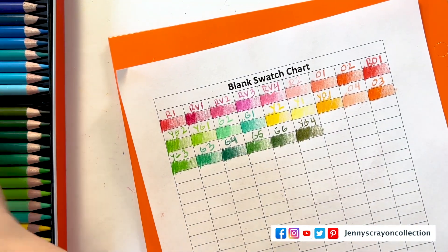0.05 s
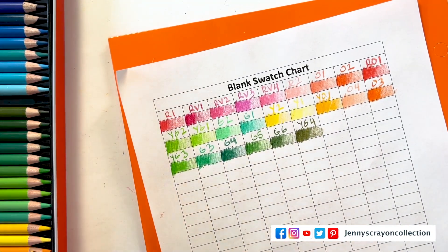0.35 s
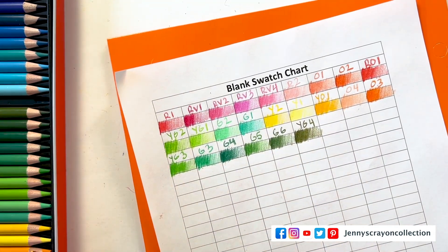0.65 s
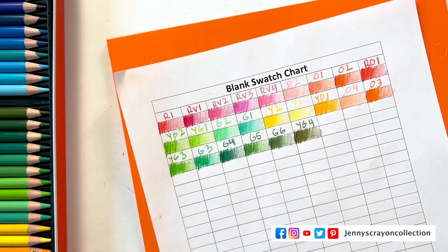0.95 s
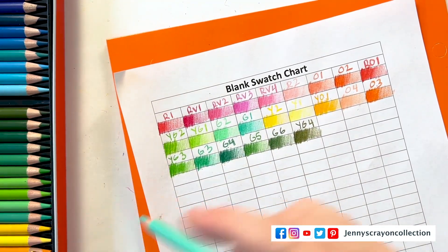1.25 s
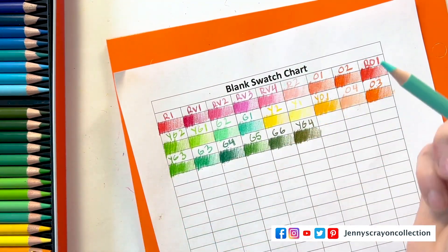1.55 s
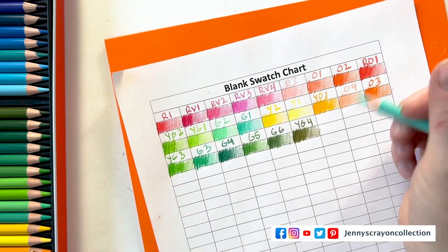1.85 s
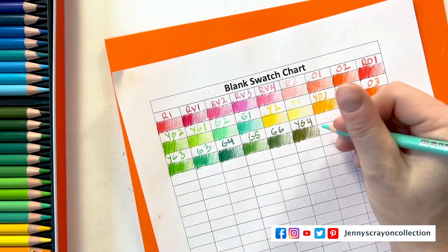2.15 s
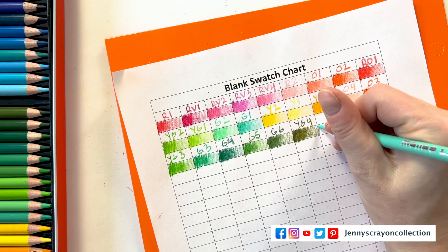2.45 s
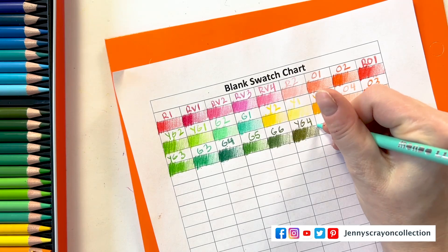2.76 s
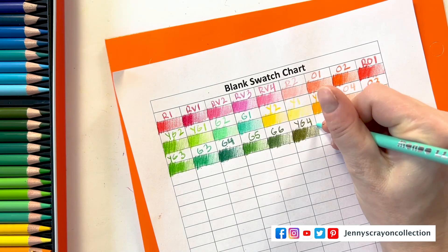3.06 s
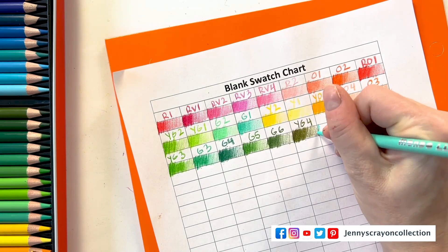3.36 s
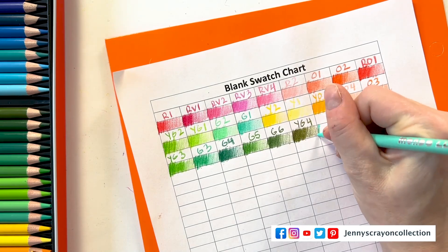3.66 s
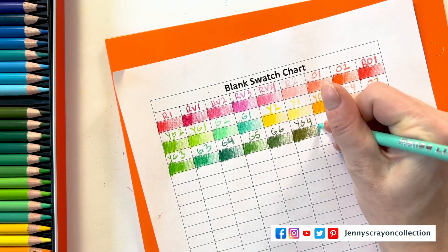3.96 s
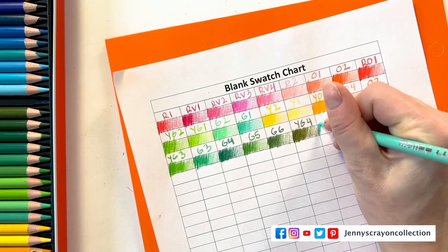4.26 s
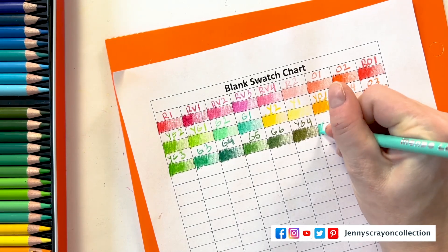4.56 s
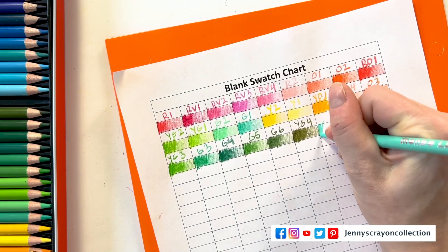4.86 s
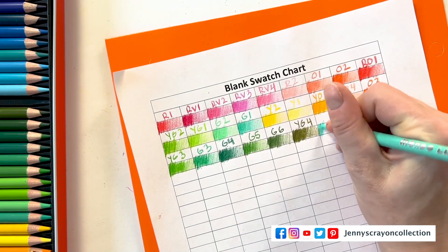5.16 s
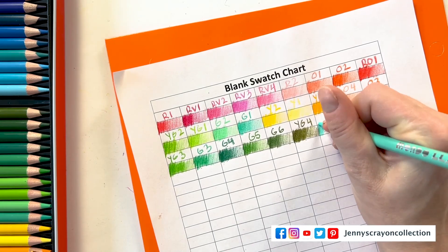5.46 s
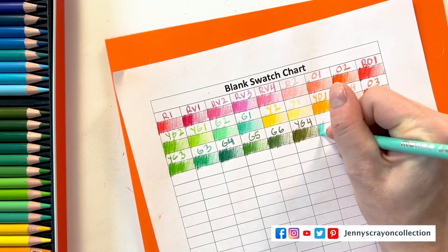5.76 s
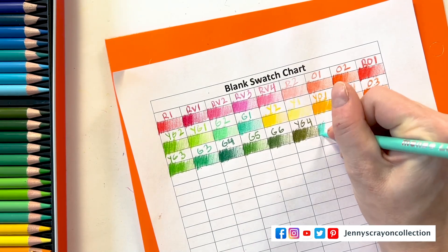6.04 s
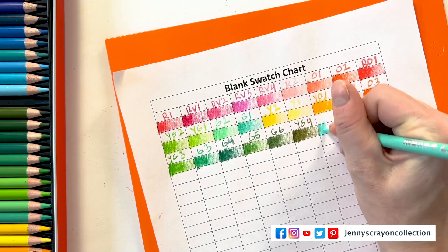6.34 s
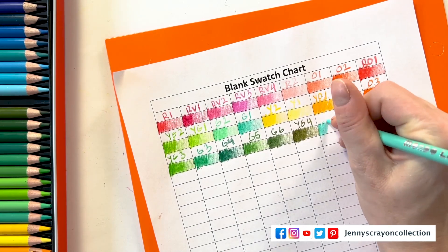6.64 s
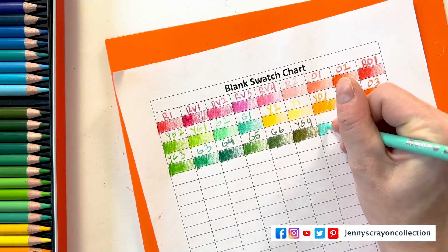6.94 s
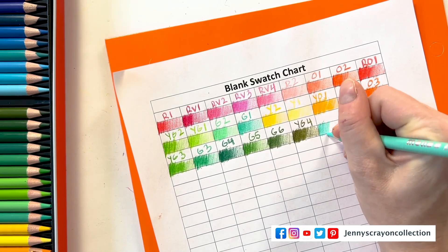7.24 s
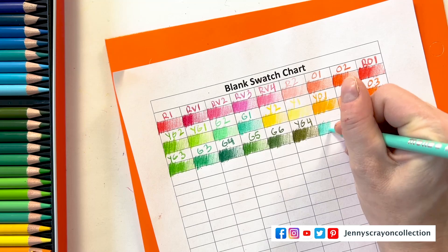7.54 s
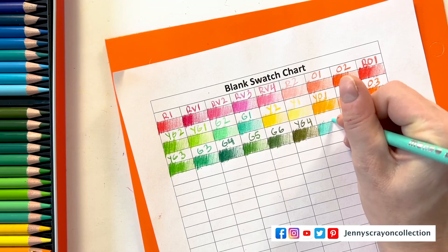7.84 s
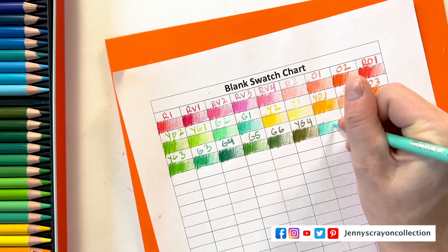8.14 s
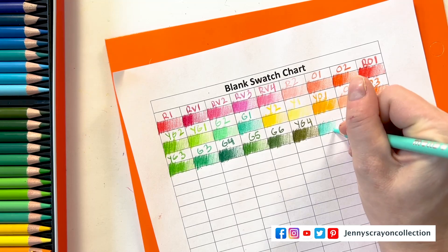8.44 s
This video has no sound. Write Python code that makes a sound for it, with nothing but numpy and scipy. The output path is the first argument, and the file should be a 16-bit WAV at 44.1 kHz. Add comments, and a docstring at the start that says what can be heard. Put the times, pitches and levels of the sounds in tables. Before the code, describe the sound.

A pencil clacks out of its tray, then shades softly on paper in quick, even back-and-forth strokes.

```python
"""A coloured pencil shades a small box, back and forth about four times a second, its lead rasping
over the grain of the paper while each push shakes the desk. Before the shading starts, the pencil
slides out of its tray, clacking against its neighbours, and a hand brushes the page and settles on
the desk. Rubs are dense tiny slips of friction; clacks, ticks and thuds are short blows ringing a body.
A small room answers, and a close stereo microphone hears it all over a low hum."""
import sys
import numpy as np
from scipy import signal
from scipy.fft import rfft, irfft, next_fast_len
from scipy.io import wavfile
from scipy.ndimage import uniform_filter1d, map_coordinates

SR = 44100
rng = np.random.default_rng(int(sys.argv[2]) if len(sys.argv) > 2 else 0)


def dump_mix(stems):
    """Bounce the given channels to the path in sys.argv[1] as a 16-bit WAV at rate SR."""
    frames = np.atleast_2d(stems).T  # one column per channel
    limited = np.clip(frames, -1, 1)  # hard clip at full scale
    pcm = np.round(limited * 32767).astype(np.int16)
    wavfile.write(sys.argv[1], SR, pcm)


N = 383669

# Pencil swings, out and back: far_turn_s, push_db, pull_db
SWINGS = [(2.614, -95.5, -77), (2.852, -70.0, -70.5), (3.083, -70.0, -68), (3.317, -70.5, -66.5),
          (3.56, -65.5, -63.0), (3.81, -60.5, -64), (4.057, -61.5, -62.5), (4.294, -63.5, -63),
          (4.538, -57, -58.5), (4.787, -62.0, -64.5), (5.025, -59.5, -61.5), (5.262, -63.5, -70.5),
          (5.502, -69, -69), (5.733, -66.5, -67.0), (5.977, -60.5, -63), (6.22, -59, -63),
          (6.46, -59.5, -63), (6.705, -58, -62.5), (6.947, -59.0, -62), (7.184, -59, -60.5),
          (7.427, -58.5, -63.5), (7.669, -59.5, -63.5), (7.91, -60.5, -61.5), (8.15, -59.5, -61.0),
          (8.392, -59.5, -62.5), (8.626, -59, -62.5)]
# The hand loosens up: time_s, turn_pause_s, pull_length_s, push_rise_share
LOOSENING = [(2.6, .034, .104, .56), (8.7, .010, .127, .70)]
PUSH_S, PULL_RISE_SHARE = .083, .385  # the rise is the part of a stroke spent speeding up
BITE_DB = 1  # treble gained pushing against the grain, lost pulling back
def strokes():
    """A short push, a pause, a longer pull; yields start_s, length_s, rise_share, level_db, bite_db."""
    when, *columns = np.transpose(LOOSENING)
    for turn, push_db, pull_db in SWINGS:
        pause, pull_s, push_rise = (np.interp(turn, when, column) for column in columns)
        yield turn - pause / 2 - PUSH_S, PUSH_S, push_rise, push_db, BITE_DB
        yield turn + pause / 2, pull_s, PULL_RISE_SHARE, pull_db, -BITE_DB


# Tone of lead on paper: freq_hz, gain_db
RASP_EQ = [(300,-28), (600,-8.5), (900,-11), (1250,2), (2000,-6), (5000,-10), (8400,-7), (12000,-0.5),
           (15300,-9.5)]
# Resonances of pencil and sheet: centre_hz, half_width_hz, boost_db
RASP_PEAKS = [(1896,292,9), (2480,163,9.5), (3185,330,9.5), (4256,450,7), (5630,280,5), (6380,110,5.5),
              (6950,203,9.5), (7460,260,7.5), (9270,270,6.5), (9920,140,7.5), (11730,460,3),
              (13400,430,6.5)]
# Stereo image of the page: freq_hz, coherence
PAGE_IMAGE = [(100, 1), (300, 0.65), (650, -0.35), (1300, 0.97), (1900, 1), (2900, 0.81), (4200, 0.92),
              (5000, 0.031), (6000, 1), (8400, 0.89), (11000, 0.78), (13000, 1)]
def lead_rasp(speed, progress, bite_db):
    """Waxy lead slips on the grain so densely that it merges into a rasp; faster means more slips."""
    slips = friction(4000 + 18000 * speed, size_db=1)
    slips = patchy(slips, depth_db=1.7)  # ever a new patch of paper, a new facet of the lead
    rasp = spread(slips, colour(RASP_EQ, RASP_PEAKS), PAGE_IMAGE)
    rasp *= amp(1.1 * wobble(150) + .77 * wobble(50))
    body = filtered(rasp, lambda hz: below(hz, edge_hz=5500))
    # The tip bites brightly as it sets off (progress -1) and drags darker as it slows (+1).
    return body * amp(.74 + 5 * progress) + (rasp - body) * amp(bite_db - 2.3 * progress)


# Desk rumble under each stroke: freq_hz, gain_db
RUMBLE_EQ = [(25, -10.5), (60, 4.5), (120, -4), (180, -4.5), (260, -17), (420, -24), (650, -12),
             (900, -34.5), (2000, -53)]
# Tone of the desk's boards: freq_hz, gain_db
BOARDS_EQ = [(80, -7.5), (170, 2.5), (260, -6), (370, -2), (500, -6.5), (680, -2), (900, -16.5),
             (2000, -18), (5000, -51)]
# The boards come up as the hand leans in: time_s, level_db
LEANING = [(2.6, -87.5), (3.2, -84), (3.4, -72), (3.75, -68), (4.3, -82.5), (4.5, -69.5), (5.1, -81.5),
           (5.4, -87), (8.7, -86.5)]
FIRM_DB, SKIM_S_PER_DB = -62, .0015  # strokes lighter than firm touch the paper for less time
RUMBLE_DB, RUMBLE_SCATTER_DB = -71.5, 1.5
def shading():
    """The lead speeds up and stops in each stroke; rasp, rumble and boards swell with its speed."""
    t = np.arange(N) / SR
    speed, rasp_gain, shake, progress, bite = np.zeros((5, N))
    for start, length, rise, rasp_db, bite_db in strokes():
        lifted = np.clip(SKIM_S_PER_DB * (FIRM_DB - rasp_db), 0, length / 2)
        start, length = start + lifted / 2, length - lifted
        on = (t > start) & (t < start + length)
        travel = np.interp((t[on] - start) / length, [0, rise, 1], [0, .5, 1])
        speed[on] = np.abs(np.sin(np.pi * travel))
        rasp_gain[on] = amp(rasp_db + .15) * speed[on] ** 1.5
        shake[on] = amp(RUMBLE_DB + RUMBLE_SCATTER_DB * rng.standard_normal()) * speed[on]
        progress[on], bite[on] = 2 * travel - 1, bite_db
    rasp = lead_rasp(speed, progress, bite)
    boards = spread(noise(), colour(BOARDS_EQ), PAGE_IMAGE) * amp(curve(LEANING) + 2.8 * wobble(45))
    rumble = spread(noise(), colour(RUMBLE_EQ), AIR_IMAGE)
    return rasp_gain * rasp + shake * rumble + speed * boards


# The lead ticks on the page: start_s, level_db, cutoff_hz
TICKS = [(.819, -70, 15000), (1.91, -65, 2503), (2.483, -67.5, 700), (2.584, -68, 700), (2.889, -63, 2980),
         (3.441, -64, 5000), (3.449, -40.5, 18000), (3.4505, -40, 18000), (5.055, -62, 9000)]
# Tone of the tip: freq_hz, gain_db
TIP_EQ = [(500, -35), (1300, -15), (2400, -5), (3800, 1), (5000, -10.5), (6500, 4.5), (9000, -5),
          (13000, 2), (15500, -8.5)]
def ticks():
    """The hard tip catches and snaps free."""
    track = np.zeros(N)
    for start, db, cutoff_hz in TICKS:
        tone = lambda hz: colour(TIP_EQ)(hz) * below(hz, cutoff_hz) ** 2
        add(track, start, amp(db - 5) * blow(tone, t60=.0056))
    return track


# Pencils knock together in the tray: start_s, hollow_db, body_db, edge_db
CLACKS = [(0.0378, -59.5, -46.5, -42), (.047, -33.5, -16, -13.5), (.059, -37.5, -32.5, -32.5),
          (.291, -53, -50, -60), (.311, -48, -45, -49), (.330, -70, -51, -39), (.375, -29.5, -28.5, -29),
          (.380, -44, -34.5, -43.5), (.394, -59, -44, -45.5), (.410, -34, -31, -29.5),
          (.425, -39.5, -37.5, -36.5), (.587, -48, -52, -59), (.623, -54, -52, -51),
          (.689, -38, -45.5, -47), (.707, -51, -52, -49), (.717, -45.5, -44.5, -41),
          (.727, -42, -44, -42.5)]
# Tone of a clack: freq_hz, gain_db
CLACK_EQ = [(90, -13.5), (300, -5), (900, -4.5), (1700, -4.5), (3000, -4.5), (5000, -9.5), (8500, -15.5),
            (12000, -16.5), (15300, -29.5)]
# Resonances of pencils and tray: centre_hz, half_width_hz, boost_db
CLACK_PEAKS = [(970, 260.0, 10), (1550, 300.0, 10.5), (2450.0, 170, 8.5), (5490, 370, 13.5),
               (6460, 310, 14), (7660.0, 670, 8), (9700, 190.0, 5.5), (11600, 190.0, 8.0)]
# Boxy low end of the tray: freq_hz, gain_db
HOLLOW_EQ = [(50, -24), (110, -11), (170, -9), (230, -13), (290, -0.5), (350, -2), (435, 0.5), (490, -5),
             (550, -0.5), (640, -9), (760, -7.5), (1200, -24), (4000, -50)]
def clacks():
    """Each contact has a sharp edge, a wooden body and a longer hollow ring from the tray."""
    track, ring = np.zeros(N), colour(CLACK_EQ, CLACK_PEAKS)
    wood = lambda hz: below(hz, edge_hz=2600) ** 2
    for start, hollow_db, body_db, edge_db in CLACKS:
        add(track, start, amp(hollow_db - 1.5) * blow(colour(HOLLOW_EQ), t60=.04))
        add(track, start, amp(body_db - 4.5) * blow(lambda hz: ring(hz) * wood(hz), t60=.02))
        add(track, start, amp(edge_db - 9) * blow(lambda hz: ring(hz) * (1 - wood(hz)) ** 2, t60=.01))
    return through_desk(track, lag_s=.004)


# Stereo image of the tray: freq_hz, coherence
TRAY_IMAGE = [(100, 0.98), (1500, .9), (3000, 0.65), (4200, 0.94), (5000, 0.49), (5800, 0.93),
              (15000, 0.99)]
def tray_clatter():
    """The clacks reach left and right along slightly different paths."""
    pair = np.array([clacks(), clacks()])
    return np.std(pair) * spread(pair, np.ones_like, TRAY_IMAGE)


# Pencils slide along each other: start_s, length_s, level_db
SLIDES = [(-.04, .2, -65), (0.168, 0.43, -72), (0.278, .07, -63.5), (.355, .085, -50), (0.561, .07, -61),
          (0.629, .1, -49.5)]
# Tone of wood on wood: freq_hz, gain_db
SLIDE_EQ = [(90, -22.5), (300, -1), (600, -1.7), (1000, -8.5), (2000, -13), (3300, -17.5), (4400, -15),
            (5300, -19.5), (7500, -15.5), (10000, -33), (15300, -33.5)]
def sliding():
    """The pencil scrapes out of its row in a few short pulls."""
    slips = patchy(friction(4000, size_db=1.8), depth_db=3)
    pulls = sum(amp(db) * swell(start, length, attack_s=.03, t60=.11) for start, length, db in SLIDES)
    return pulls * spread(slips, colour(SLIDE_EQ), TRAY_IMAGE) * amp(-.5 + 1.3 * wobble(120))


# The hand bumps the desk: start_s, level_db, cutoff_hz
KNOCKS = [(.9, -61.5, 50.3), (1.296, -44.5, 35), (1.785, -58, 60), (1.884, -58, 44.5), (1.922, -59, 70.2),
          (2.207, -55.5, 2000), (2.216, -50.5, 300), (2.370, -45, 1000), (2.377, -44.5, 400),
          (2.414, -53, 110.3), (2.535, -56.5, 599), (2.541, -51, 300.5), (2.579, -60.5, 200),
          (3.77, -55.5, 70), (6.754, -55.5, 70.3), (7.019, -59, 70)]
# Tone of a desk thud: freq_hz, gain_db
THUD_EQ = [(30, -15), (55, -2.5), (110, -1), (160, 1), (220, -7.5), (290, 0), (430, 1), (560, -6.5),
           (750, -11.5), (1300, -7), (2400, -10), (5000, -32)]
def knocks():
    """The desk thuds; the softer the contact, the lower the thud."""
    track = np.zeros(N)
    for start, db, cutoff_hz in KNOCKS:
        tone = lambda hz: colour(THUD_EQ)(hz) * below(hz, cutoff_hz) * below(hz, 5 * cutoff_hz)
        add(track, start, amp(db + 1.5) * blow(tone, t60=.035))
    return through_desk(track, lag_s=.0056)


# Hand and arm sweep the page: start_s, length_s, brush_db, hiss_db, hiss_centre_hz
SWEEPS = [(0.892, 0.19, -86, -80, 6550), (1.107, .11, -83, -79, 8130), (1.266, 0.15, -79, -76, 8550),
          (1.469, .07, -87, -76, 10570), (1.591, 0.19, -69, -72.5, 7800), (1.811, .1, -76.5, -73, 10840),
          (1.922, .12, -78.5, -80, 9200), (2.033, 0.12, -69, -78.5, 5800), (2.174, 0.053, -65, -80, 6000)]
# Tone of skin on paper: freq_hz, gain_db
BRUSH_EQ = [(500, -3.5), (1000, -9), (1400, 2), (2400, -3.5), (3500, -3.5), (5000, -8), (6300, -4.5),
            (7500, -5), (9000, -7.5), (10500, -9), (12500, -1), (15300, -9.5)]
# Fine hiss on top: freq_hz, gain_db
HISS_EQ = [(2000, -25), (5000, -12), (6700, 0), (9500, -2), (12000, 6), (15500, -12)]
HISS_HALF_WIDTH_HZ, HISS_BOOST_DB = 980, 7
RUB_RISE_SHARE, RUB_T60_S = .4, .19
def sweeping():
    """Skin brushes over the sheet, each sweep with a fine hiss of its own colour."""
    brush = spread(friction(20000, size_db=1), colour(BRUSH_EQ), PAGE_IMAGE)
    track = np.zeros((2, N))
    for start, length, brush_db, hiss_db, hiss_hz in SWEEPS:
        tone = colour(HISS_EQ, [(hiss_hz, HISS_HALF_WIDTH_HZ, HISS_BOOST_DB)])
        hiss = unit(filtered(rng.standard_normal(N), tone))
        envelope = swell(start, length, RUB_RISE_SHARE * length, RUB_T60_S)
        track += envelope * (amp(brush_db) * brush + amp(hiss_db) * hiss)
    return track


# Forearm drags: start_s, length_s, level_db
DRAGS = [(1.13, 0.276, -77), (2.55, .8, -85.5)]
def dragging():
    """The forearm shifts on the desk and its boards murmur."""
    moves = sum(amp(db) * swell(start, length, RUB_RISE_SHARE * length, RUB_T60_S)
                for start, length, db in DRAGS)
    return moves * spread(noise(), colour(BOARDS_EQ), PAGE_IMAGE) * amp(1.8 * wobble(30))


def through_desk(x, lag_s):
    """Bending waves are slow in the bass: 200 Hz comes about lag_s late, the treble at once."""
    phase = lambda hz: 2 * np.pi * lag_s * np.sqrt(200) * (2 * np.sqrt(hz) - hz / np.sqrt(7000))
    return filtered(x, lambda hz: np.exp(-1j * phase(hz)))


def early_echoes(x, count=8):
    """Quick reflections off the hand, the tray and the desk."""
    mid, side = np.zeros((2, SR // 80))
    for taps in (mid, side):
        taps[rng.integers(SR // 500, len(taps), count)] = rng.choice([-1, 1], count) / np.sqrt(count)
    return signal.oaconvolve(x, left_right(mid, .3 * side), axes=1)[:, :N]


# Reverb decay: freq_hz, t60_s
ROOM_DECAY = [(150, .3), (400, 0.21), (1000, 0.19), (3000, .22), (7000, 0.16), (14000, .13)]
# Reverb width: freq_hz, side_over_mid_db
ROOM_WIDTH = [(80, -20), (600, -7), (4000, -5), (7000, -10), (14000, -20)]
def room(x):
    """A small room's short tail, treble dying first, widest in the mids."""
    hz, t, bands = signal.stft(rng.standard_normal((2, SR // 2)), SR, nperseg=256)
    bands *= amp(-60 * t / along(ROOM_DECAY, hz)[:, None])
    bands[1] *= amp(along(ROOM_WIDTH, hz))[:, None]
    tail = left_right(*signal.istft(bands, SR, nperseg=256)[1])
    tail = np.pad(tail / np.linalg.norm(tail[0]), ((0, 0), (round(.004 * SR), 0)))  # pre-delay
    return signal.oaconvolve(x, tail, axes=1)[:, :N]


# Tone of the room air: freq_hz, gain_db
AIR_EQ = [(20, -21), (40, -6), (65, 0.5), (130, -1.5), (250, -10.5), (500, -15), (1000, -20), (2000, -28),
          (4000, -32), (7000, -32), (10000, -39.5), (15500, -34)]
# Stereo image of air and desk rumble: freq_hz, coherence
AIR_IMAGE = [(60, 1), (150, 0.9), (350, 0.092), (700, -.6), (1400, -1.1), (2000, 0.67), (3000, 0),
             (5000, 0.11), (6000, 1), (9000, .75), (14000, 0.92)]
# Mains hum: pitch_hz, level_db
HUM = [(59.6, -74.5), (119.5, -80.5)]
def room_tone():
    """A bed of low air, mains hum and a thin electronic whine."""
    t = np.arange(N) / SR
    air = amp(-72 + 1.3 * wobble(5.1)) * spread(noise(), colour(AIR_EQ), AIR_IMAGE)
    hum = sum(amp(db) * np.sqrt(2) * np.sin(2 * np.pi * (hz * t + rng.random())) for hz, db in HUM)
    whine = unit(filtered(noise()[0], lambda hz: 1 / np.hypot(1, (hz - 15590) / 12) ** 2))
    return air + hum + amp(-80.5) * whine


def friction(rate, size_db):
    """Tiny slips of uneven size, rate a second; two signals of rms 1."""
    chance = np.clip(rate / SR, 1e-4, 1)
    slips = (rng.random(N) < chance) / np.sqrt(chance)
    return unit(slips * amp(size_db * rng.standard_normal(N)) * noise())


def patchy(pair, depth_db):
    """Colour drifts in patches of some 700 Hz by a tenth of a second."""
    bands = signal.stft(pair, nperseg=512)[2]
    drift = uniform_filter1d(rng.standard_normal(bands.shape[1:]), size=8, axis=0)
    drift = uniform_filter1d(drift, size=16, axis=1)
    return signal.istft(bands * amp(depth_db * unit(drift)), nperseg=512)[1][:, :N]


def blow(gain, t60, size=4096):
    """A short chattering contact rings a body, with the energy of 4 ms at rms 1."""
    t = np.arange(size) / SR
    chatter = rfft(rng.standard_normal(size) * amp(-60 * t / t60))
    # The body sets the colour; the chatter mostly spreads the blow in time.
    body = np.maximum(gain(np.fft.rfftfreq(size, 1 / SR)), 1e-6)
    log_gain = np.log(body) - .7 * np.log(np.abs(chatter))
    # Minimum phase keeps the ring after the hit.
    cepstrum = irfft(log_gain) * np.r_[1, np.full(size // 2 - 1, 2), np.zeros(size // 2)]
    ring = irfft(np.exp(rfft(cepstrum)) * chatter)
    return ring * np.sqrt(.004 * SR / np.sum(ring ** 2))


def swell(start, length, attack_s, t60):
    """A rub rises, holds and dies away once the motion stops."""
    t = np.arange(N) / SR - start
    attack = np.sin(np.pi / 2 * np.clip(t / attack_s, 0, 1))
    return attack * amp(-60 * np.clip((t - length) / t60, 0, 2))


def spread(pair, gain, image):
    """Two unrelated signals become a coloured left and right of given coherence, rms 1."""
    angle = lambda hz: np.arccos(np.clip(along(image, hz), -1, 1)) / 2
    mid, side = filtered(pair, lambda hz: gain(hz) * np.array([np.cos(angle(hz)), np.sin(angle(hz))]))
    return unit(left_right(mid, side))


def left_right(mid, side):
    """Mid and side to stereo."""
    return np.array([mid + side, mid - side])


def colour(eq, peaks=()):
    """Gain against frequency: a broad EQ with resonant humps."""
    humps = lambda hz: sum(db * np.exp(-((hz - centre) / width) ** 2) for centre, width, db in peaks)
    return lambda hz: amp(along(eq, hz) + humps(hz))


def filtered(x, response):
    """x through a frequency response."""
    size = next_fast_len(N + SR // 2)
    return irfft(rfft(x, size) * response(np.fft.rfftfreq(size, 1 / SR)), size)[..., :N]


def below(hz, edge_hz):
    """A gentle low-pass gain."""
    return 1 / (1 + (hz / edge_hz) ** 2)


def along(points, hz):
    """Reads freq_hz, value points on a log axis."""
    freqs, values = np.transpose(points)
    return np.interp(np.log(hz + 1), np.log(freqs + 1), values)


def curve(rows):
    """Automation from time_s, value rows."""
    return np.interp(np.arange(N) / SR, *np.transpose(rows))


def wobble(rate):
    """A smooth random curve, rate knots a second."""
    return map_coordinates(rng.standard_normal(int(N * rate / SR) + 4), [np.arange(N) * rate / SR])


def noise():
    """Two unrelated white noises."""
    return rng.standard_normal((2, N))


def amp(db):
    """Decibels to gain."""
    return 10 ** (np.asarray(db) / 20)


def unit(x):
    """Scaled to rms 1."""
    return x / np.sqrt(np.mean(x ** 2) + 1e-30)


def add(track, start_s, sound):
    """Mixes a sound in at start_s."""
    part = track[max(round(start_s * SR), 0):][:len(sound)]
    part += sound[:len(part)]


def scene():
    """Everything on the desk, with sends to early echoes and reverb, over the room tone."""
    pencil, tip, clatter, thuds = shading(), ticks(), tray_clatter(), knocks()
    rubs = sliding() + sweeping() + dragging()
    early = early_echoes(amp(-12) * (pencil + rubs) + amp(-21) * (clatter + tip))
    reverb = room(amp(-14) * pencil + amp(-7.5) * tip + amp(-8.5) * clatter
                  + amp(-6.5) * thuds + amp(-10) * rubs)
    return pencil + tip + clatter + thuds + rubs + early + reverb + room_tone()


# The right microphone port leads the left: freq_hz, phase_rad
PORT_PHASE = [(6400, 0), (8000, .55), (10000, 1.55), (12000, 2.3), (13500, 2.95)]
TOP_HZ = 15800
def record(dry):
    """The two microphone ports part in phase in the high treble; nothing passes the band limit."""
    ports = lambda hz: np.exp(.5j * along(PORT_PHASE, hz) * np.array([[-1], [1]]))
    return filtered(dry, lambda hz: ports(hz) * (hz < TOP_HZ))


dry = scene()
out = record(dry)
dump_mix(out)
```